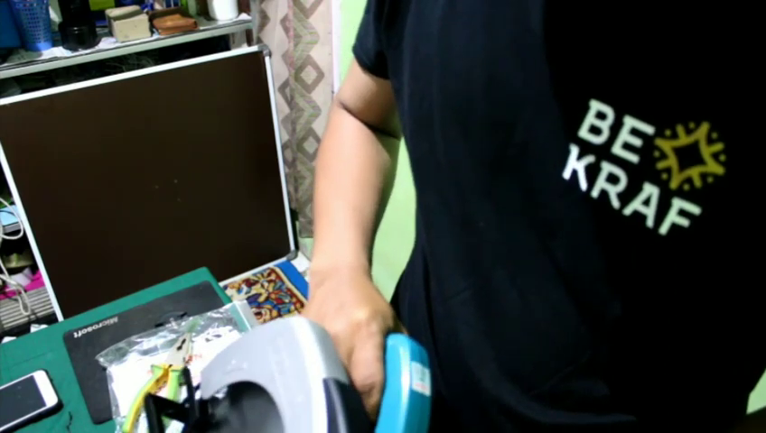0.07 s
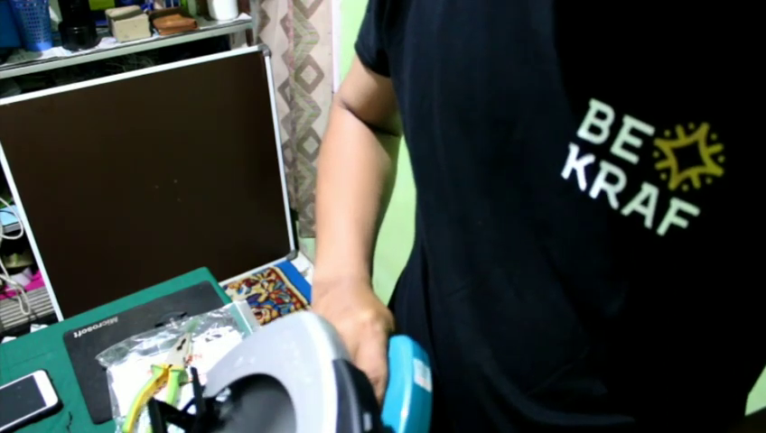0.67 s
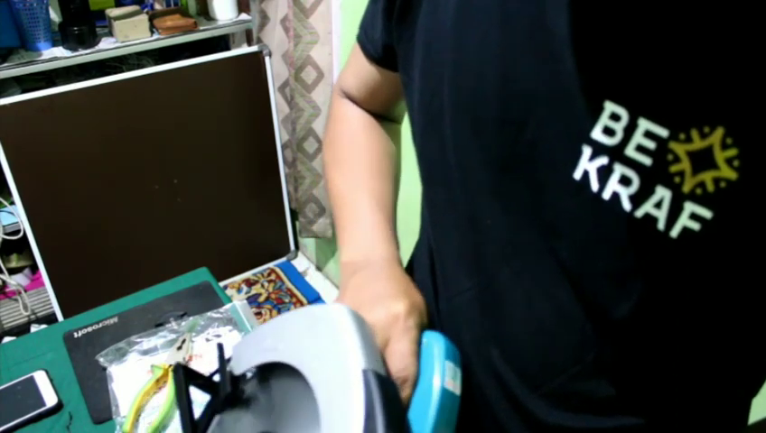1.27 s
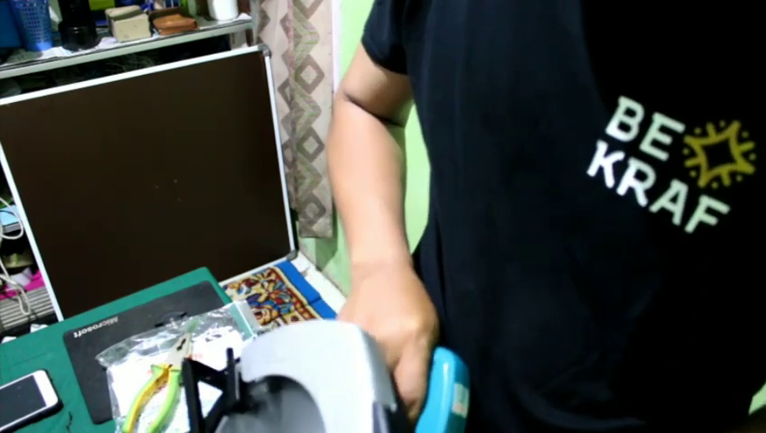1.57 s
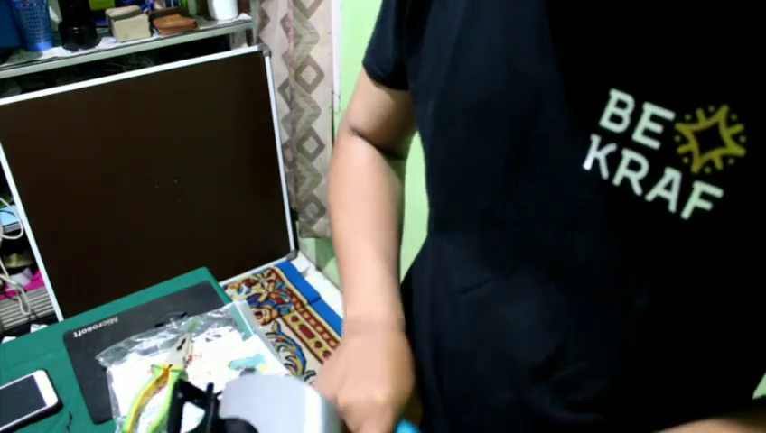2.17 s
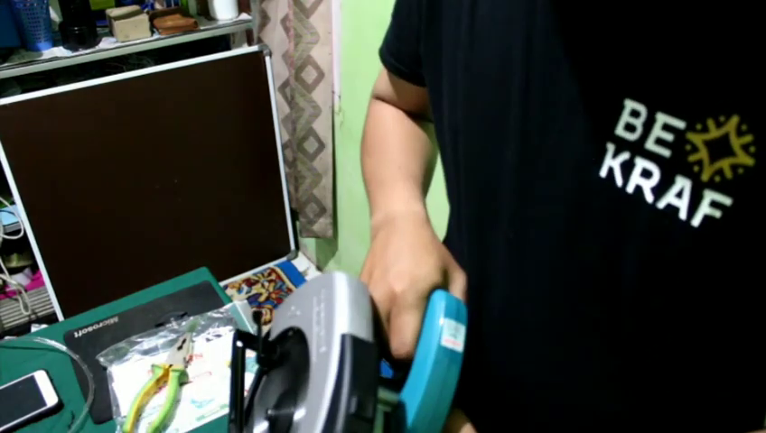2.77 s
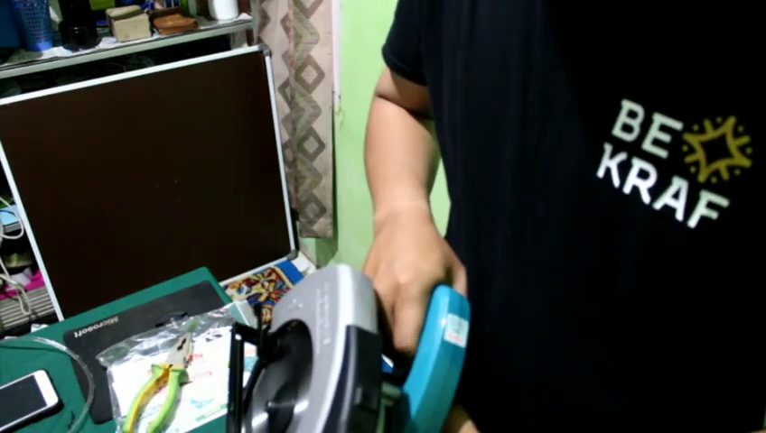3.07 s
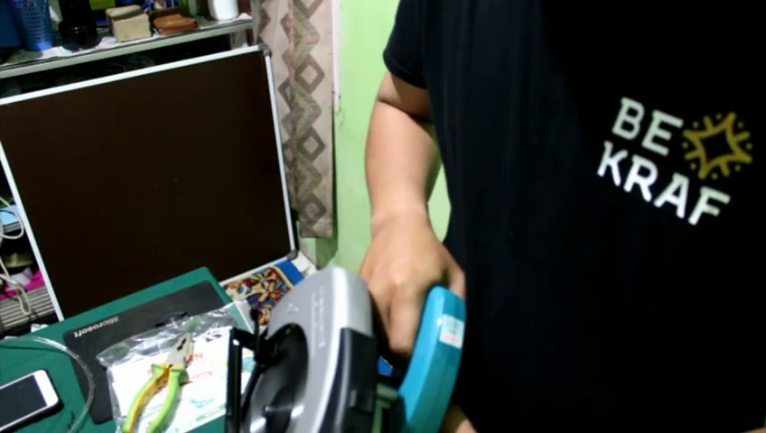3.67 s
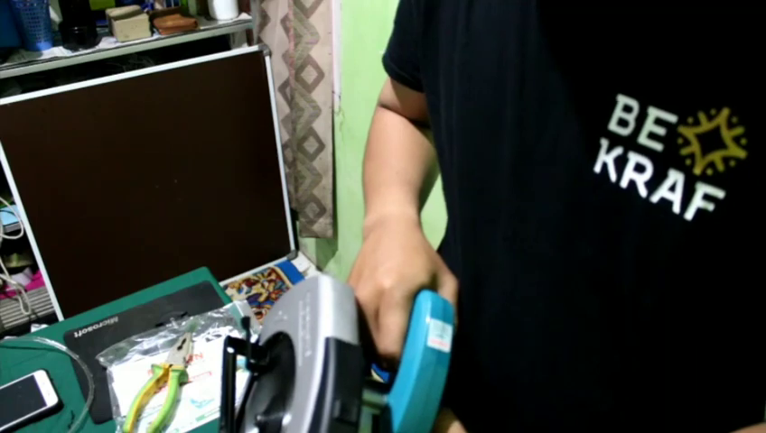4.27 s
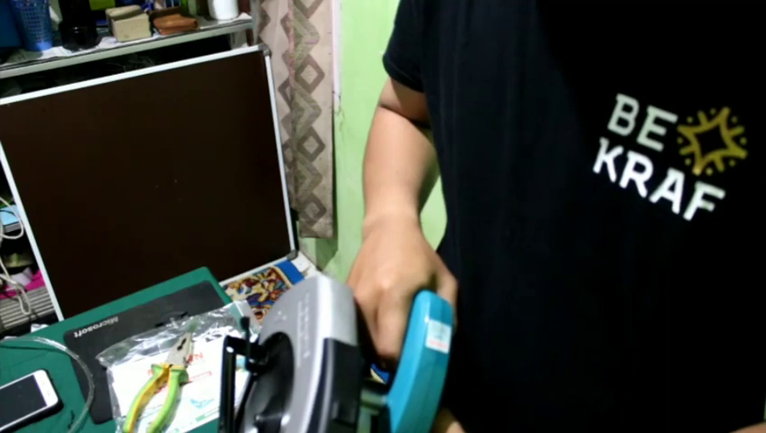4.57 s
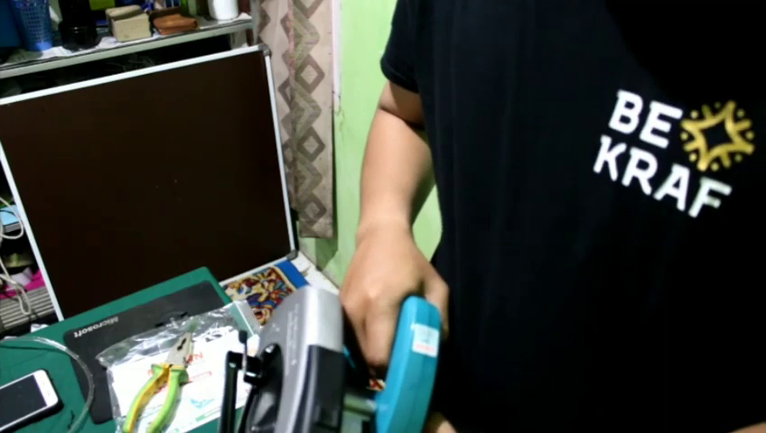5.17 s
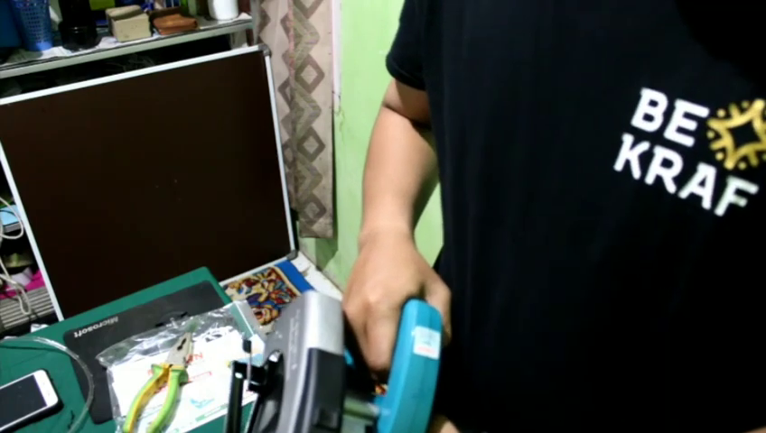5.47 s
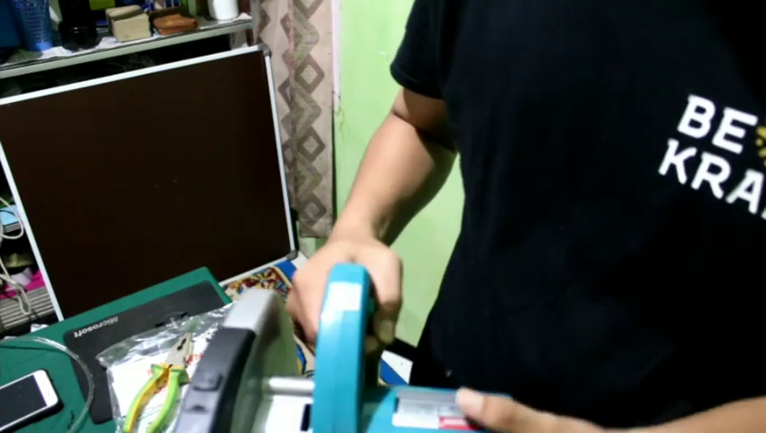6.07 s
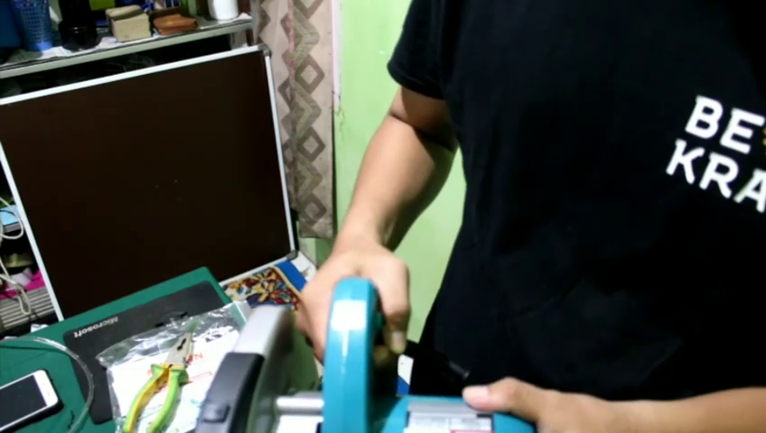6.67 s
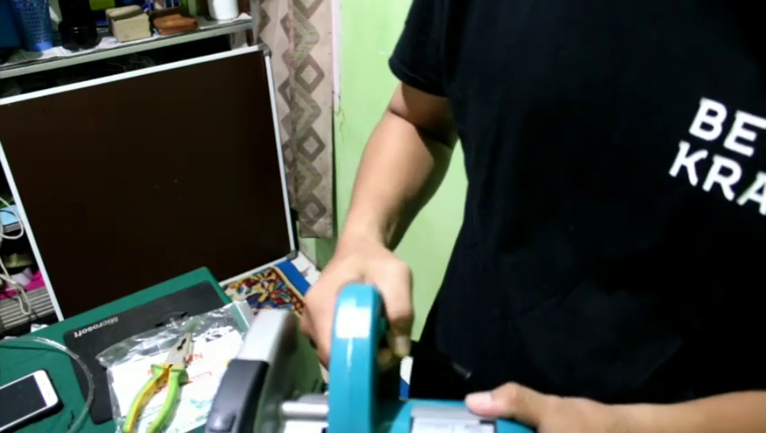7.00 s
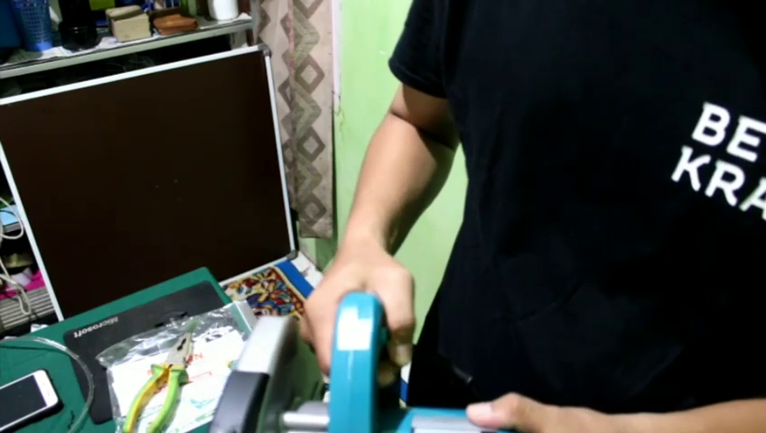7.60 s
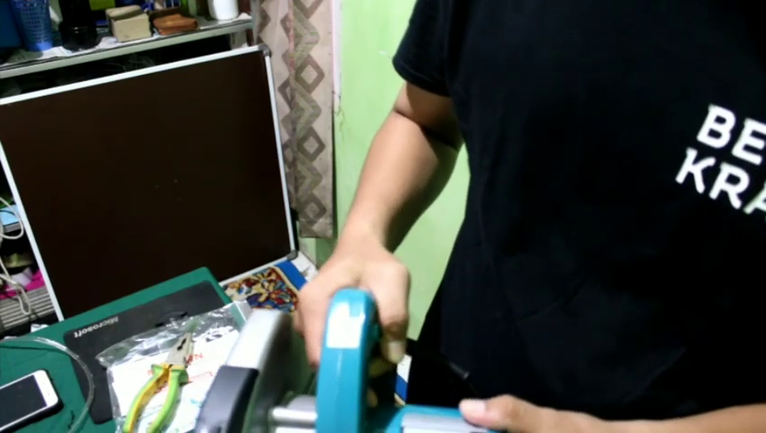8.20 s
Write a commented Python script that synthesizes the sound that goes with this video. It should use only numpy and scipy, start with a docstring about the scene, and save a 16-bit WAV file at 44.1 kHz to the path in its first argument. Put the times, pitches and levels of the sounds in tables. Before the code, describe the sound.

A handheld circular saw runs freely in a small workshop, heard up close. Its gears grind to a halt, the blade ringing faintly over a low handling rumble. The motor kicks in with a loud knock and whirs up briefly, then coasts with rapid metallic gear chatter. Its rush of air, hiss and whine grow brighter before a second, longer trigger pull winds it up and it coasts again.

```python
"""A handheld circular saw runs without load in a small workshop. First its gears grind to a halt, the blade
ringing and the last teeth snapping past. At 2.7 s the trigger kicks the motor up to speed with a knock;
it coasts down, gears chattering in their backlash, and from 5.3 s its vents swing towards the listener,
bringing up the fan rush, brush hiss and whine. At 6.9 s a second, longer pull winds it up again,
and from 7.7 s it coasts once more."""
import sys
import numpy as np
from scipy import signal
from scipy.fft import rfft, irfft
from scipy.io import wavfile
from scipy.ndimage import uniform_filter1d

SR = 44100
rng = np.random.default_rng(int(sys.argv[2]) if len(sys.argv) > 2 else 0)


def to_wav(sig):
    """Store sig (one row per channel, or 1-D mono) as 16-bit WAV at the path in sys.argv[1].

    Samples outside -1..1 are clipped; the rate is SR.
    """
    pcm = np.clip(np.atleast_2d(sig), -1, 1) * 32767
    pcm = np.round(pcm).astype(np.int16)
    wavfile.write(sys.argv[1], SR, pcm.T)  # frames by channels


N = 367794
TIME = np.arange(N) / SR
CUTOFF_HZ = 15500


def from_db(db):
    """Decibels to gain."""
    return 10 ** (np.asarray(db) / 20)


def rms_one(x):
    """Scale to rms 1."""
    return x / np.sqrt(np.mean(x ** 2) + 1e-20)


def in_time(points):
    """An automation curve of (seconds, value) points, read at every sample."""
    return np.interp(TIME, *np.transpose(points))


def at_hz(points, hz):
    """Read an EQ curve on a log-frequency axis."""
    f, level = np.transpose(points)
    return np.interp(np.log(np.maximum(hz, 1)), np.log(f), level)


def near(speed, centre, octaves):
    """1 at the centre speed, falling to 0 on either side of it."""
    return np.exp(-(np.log2(speed / centre) / octaves) ** 2)


def drift(rate_hz):
    """Smooth random wobble of rms 1."""
    r = np.exp(-40 * np.pi * rate_hz / SR)
    slow = signal.lfilter([1], [1, -2 * r, r * r], rng.standard_normal(N // 20 + 2002))[2000:]
    return np.interp(np.arange(N) / 20, np.arange(len(slow)), rms_one(slow))


def resonate(x, hz, width):
    """Two-pole resonance with gain 1 at its peak."""
    r = np.exp(-np.pi * width / SR)
    poles = [1, -2 * r * np.cos(2 * np.pi * hz / SR), r * r]
    return signal.lfilter(np.array([1, 0, -1]) * (1 - r * r) / 2, poles, x + 1e-18)


def colour(x, spectrum, resonances=(), size=4096):
    """Minimum-phase EQ of unit power: a broad curve plus resonances (Hz, width in Hz, lift in dB)."""
    cepstrum = irfft(np.log(from_db(at_hz(spectrum, np.fft.rfftfreq(size, 1 / SR)))))
    cepstrum[1:size // 2] *= 2
    cepstrum[size // 2 + 1:] = 0
    response = irfft(np.exp(rfft(cepstrum)))
    for hz, width, lift_db in resonances:
        response = response + (from_db(lift_db) - 1) * resonate(response, hz, width)
    return signal.oaconvolve(x, response / np.linalg.norm(response))[:N]


def noise(spectrum):
    """Coloured noise of rms 1."""
    return colour(rng.standard_normal(N), spectrum)


def impacts(per_s, spread_db):
    """Uneven metal-on-metal clicks of mean power 1."""
    chance = np.clip(per_s / SR, 1e-4, 1)
    sizes = rms_one(from_db(spread_db * np.clip(rng.standard_normal(N), -2, 2)))
    signs = rng.choice([-1, 1], N)
    return (rng.random(N) < chance) * sizes * signs / np.sqrt(chance)


def blow(age, rise, hold, decay):
    """A contact bites, scrapes for a moment and dies away; times in seconds."""
    return np.minimum(age / rise, 1) * np.exp(-np.maximum(age - hold, 0) / decay)


def bursts(rows, rise, decay):
    """Joint envelope of blows, each given as start in seconds, level in dB, scrape in seconds."""
    power = np.zeros(N)
    for s, db, hold in rows:
        start = int(s * SR)
        age = TIME[:min(SR // 5, N - start)]
        power[start:start + len(age)] += (from_db(db) * blow(age, rise, hold, decay)) ** 2
    return np.sqrt(power)


def tones(speed, orders, radiation, width_hz, steady):
    """Partials locked to the rotor; all but a steady share of each is smeared into a rough band."""
    out, angle = 0, 2 * np.pi * np.cumsum(speed) / SR
    rough = drift(width_hz) + 1j * drift(width_hz)
    swing = np.sqrt(2 * steady) + np.sqrt(1 - steady) * rough
    size, slip = np.abs(swing), np.angle(swing)
    for multiple, db in orders:
        hz, shift = multiple * speed[::64], rng.integers(N)
        gain = np.repeat((hz < CUTOFF_HZ) * from_db(db + at_hz(radiation, hz)), 64)[:N]
        out = out + gain * np.roll(size, shift) * np.sin(multiple * angle + np.roll(slip, shift))
    return out


# Room tone EQ. Each row: frequency in Hz, level in dB.
ROOM_TONE_EQ = [(40, -24), (100, -17), (200, -5), (400, -16), (800, 1), (1600, -5), (4000, -9), (9000, -17),
                (15000, -47)]

def room_tone():
    """A quiet, steady bed of noise."""
    return from_db(-55) * noise(ROOM_TONE_EQ)


# The rumble's fader. Each row: time in seconds, level in dB.
HANDLING_FADER = [(0, -58), (1.0, -56.5), (1.5, -45.5), (1.65, -41), (2.0, -47.5), (2.6, -49.5), (2.8, -62),
                  (8.34, -60)]
# Its dull tone. Each row: frequency in Hz, level in dB.
HANDLING_EQ = [(25, -20), (45, -20), (65, -10.5), (110, -9.5), (200, -8), (400, -12.5), (1000, -20),
               (3000, -46)]

def handling():
    """Hands shift on the saw's body with a low rumble."""
    return from_db(in_time(HANDLING_FADER) + 1.5 * drift(2)) * noise(HANDLING_EQ)


# Peaks and nulls between saw, bench and walls. Each row: frequency in Hz, width in Hz, lift in dB.
ROOM_MODES = [(280, 17, 2), (345, 50, 4.5), (435, 60, -6), (506, 16, 2.5), (610, 40, 4.5), (655, 30, -3),
              (735, 60, 4), (800, 50, -4), (875, 45, 4.5), (935, 25, 3), (1020, 35, -3), (1070, 30, 2.5),
              (1120, 30, -3), (2880, 200, -3), (5140, 520, -3.5)]

def workshop(x, t60, wet_db):
    """Standing waves, then dense, short reflections from close walls and shelves."""
    for hz, width, lift_db in ROOM_MODES:
        x = x + (from_db(lift_db) - 1) * resonate(x, hz, width)
    age = TIME[:SR // 2]
    tail = rng.standard_normal(len(age)) * from_db(-60 * age / t60) * (age > .003)
    return x + from_db(wet_db) * signal.oaconvolve(x, tail / np.linalg.norm(tail))[:N]


# The last teeth before the blade stops. Each row: start in seconds, level in dB.
SNAPS = [(1.992, -22), (2.102, -32), (2.180, -46)]
# Their bright tone. Each row: frequency in Hz, level in dB.
SNAP_EQ = [(300, -17), (1500, 1), (3000, 7), (8000, -5), (11000, -20), (15000, -32)]

def snaps():
    """Dry clicks as single teeth drop off one another."""
    force = bursts([(s, db, .002) for s, db in SNAPS], rise=.0006, decay=.004)
    return colour(impacts(12000, spread_db=4) * force, SNAP_EQ)


# The steel blade's modes. Each row: frequency in Hz, level in dB, width in Hz.
BLADE_MODES = [(860, -3, 3), (926, -6, 12), (1798, 0, 10), (1803, -5, 4), (1868, -7, 3), (2099, -8, 4),
               (2153, -9, 4), (2412, 0, 12), (2487, -1, 9), (2665, 1, 12), (2848, -4, 10), (2918, -4, 10),
               (3172, -3, 8), (3178, -11, 4), (3235, 1, 10), (3435, -7, 9), (3537, -9, 3), (3598, -5, 4),
               (3612, -3, 9), (4086, -10, 3), (4393, -4, 9), (4540, -5, 12), (4737, -1, 10), (4790, -5, 10),
               (4947, -5, 9), (4996, -6, 9), (5340, -13, 9), (5841, -9, 9), (6234, -9, 9), (6573, -8, 10),
               (6700, -10, 12), (7181, -9, 9), (7270, -10, 9), (7355, -18, 4), (7391, -6, 8),
               (7752, -15, 3), (7811, -12, 8), (7900, -12, 9), (8250, -14, 12), (8430, -15, 12),
               (9500, -19, 9), (10200, -21, 10), (10810, -19, 10), (11050, -22, 10)]

def blade_ring(teeth, speed):
    """The teeth ring the blade: damped modes follow the speed, narrow ones come out as it slows."""
    rubbed = teeth * from_db(-12.5) * np.tanh(speed / 184)
    free = teeth * from_db(-11) / np.hypot(1, (speed / 45.3) ** 3)
    waver = from_db(1.6 * drift(6.1))
    out = 0
    for hz, db, width in BLADE_MODES:
        mode = resonate(free if width < 5 else rubbed, hz, width) * np.sqrt(SR / (np.pi * width))
        out = out + from_db(db) * np.roll(waver, rng.integers(N)) * mode
    return out


# How hard the slow turns grind. Each row: time in seconds, level in dB.
GRIND_FADER = [(0, -22), (.7, -17.5), (1.25, -16), (1.55, -13.5), (1.85, -16), (2.05, -14.5)]
# Accents where the teeth catch hardest. Each row: start in seconds, level in dB.
CATCHES = [(.157, -18.5), (0.223, -17.5), (0.303, -18), (0.678, -19.5), (0.867, -28), (.920, -35),
           (.998, -19), (1.196, -20)]
# The grind's tone. Each row: frequency in Hz, level in dB.
GRIND_EQ = [(120, -41), (330, -17.5), (500, -11), (850, -2), (1200, 1), (1620, 6.5), (2240, 1),
            (2900, -2.5), (3900, -10.5), (4600, -3), (5400, -12), (8500, -19), (11000, -23.5), (15500, -52)]

def runout(speed, fade_speed=70, release_s=.0081):
    """Over the last slow turns the teeth grind and catch, the brushes rasp and the blade rings on."""
    r = np.exp(-1 / (release_s * SR))
    turning = 1 - signal.lfilter([1 - r], [1, -r], 1 - np.tanh(speed / fade_speed))
    pressure = from_db(in_time(GRIND_FADER) + 1.7 * drift(64)) * turning * (TIME < PULLS[0][0])
    catches = from_db(1.5) * bursts([(s, db, .0048) for s, db in CATCHES], rise=.0022, decay=.0093)
    teeth = impacts(2500 + 30 * speed, spread_db=.5) * np.hypot(pressure, catches)
    grind = from_db(-.2) * colour(teeth, GRIND_EQ, [(1655, 120, 6.5), (7040, 180, -4)])
    rasp = near(speed, 19.7, octaves=.7) * resonate(resonate(teeth, 8400, 540), 8400, 540)
    return grind + rasp + blade_ring(teeth, speed)


# Gearbox and blade guard resonances. Each row: frequency in Hz, width in Hz, lift in dB,
# level of the struck ring in dB.
HOUSING_MODES = [(1606, 200, 2.5, -4.5), (1690, 120, 3, -23), (2490, 89, 6.5, -20), (3200, 55, 4.5, -22),
                 (3394, 49, 13.5, -25), (4570, 710, 6, -12), (5690, 90, 2, -16.5), (6110, 60, 8.5, -17),
                 (6700, 89, 8.5, -20.5), (7960, 160, 11.5, -34), (8270, 130, -10, -15)]

def housing_ring(contacts, detune=.016):
    """Each contact lands on another tooth, so the housing rings at a slightly different pitch."""
    out, age = np.zeros(N), TIME[:SR // 10]
    hz, _, _, struck_db = np.transpose(HOUSING_MODES)
    for s, db, hold, clang_db in contacts:
        offset, phase = rng.standard_normal((2, len(hz)))
        gain = from_db(db + struck_db + clang_db * (hz < 2000))
        modes = np.sin(2 * np.pi * (np.outer(age, hz * (1 + detune * offset)) + phase))
        start = int(s * SR)
        out[start:start + len(age)] += modes @ gain * blow(age, rise=.004, hold=hold / 2, decay=.0076)
    return out


# Gear slaps between the two pulls. Each row: start in seconds, level in dB, scrape in seconds,
# extra low clang in dB.
SLAPS = [(2.978, -14, 0.003, -7), (3.03, -12, 0.0028, 0), (3.104, -9.5, 0.003, -6), (3.144, -17, 0.005, -7),
         (3.191, -10, 0.0036, -1), (3.238, -14.5, 0.005, -1), (3.299, -15, 0.0065, 6),
         (3.36, -14, 0.0084, -5), (3.423, -12, 0.0064, -12), (3.482, -14.5, 0.01, 1),
         (3.552, -11, 0.0046, -21), (3.592, -15.5, 0.0073, -17), (3.636, -17.5, 0.0083, 3),
         (3.697, -13, 0.0048, 0.5), (3.747, -19.5, 0.011, -2), (3.806, -16.5, 0.025, -13),
         (3.862, -14, 0.0042, 9.5), (3.916, -15, 0.0038, -1), (3.959, -17.5, 0.012, -13),
         (4.013, -14.5, 0.0042, -16), (4.056, -14, 0.0077, 9), (4.133, -10, 0.0024, 7),
         (4.183, -18, 0.003, 14.5), (4.237, -29, 0.008, 18), (4.297, -17.5, 0.0069, 10.5),
         (4.342, -18.5, 0.014, 7), (4.399, -13, 0.003, 13), (4.462, -18.5, 0.0037, 5),
         (4.515, -18, 0.0045, 11.5), (4.574, -20, 0.008, 10), (4.631, -20, 0.01, 7),
         (4.688, -16.5, 0.0068, 13), (4.753, -16.5, 0.0077, 11.5), (4.814, -15.5, 0.0054, 9),
         (4.877, -16, 0.0082, 7), (4.947, -11, 0.0034, -13), (5.005, -19, 0.019, -1),
         (5.071, -17, 0.0099, 11), (5.141, -16, 0.0084, 12), (5.212, -17, 0.0059, 14),
         (5.28, -16.5, 0.0069, 13), (5.355, -16.5, 0.0061, 12.5), (5.429, -17, 0.0054, -3),
         (5.472, -22, 0.021, -2), (5.539, -19.5, 0.031, 6), (5.6, -18, 0.014, -19), (5.634, -18, 0.012, -3),
         (5.683, -17, 0.0067, -9), (5.719, -19, 0.0083, 8), (5.77, -18.5, 0.007, -3),
         (5.808, -18, 0.0058, 11.5), (5.855, -17.5, 0.0087, 5), (5.889, -20.5, 0.014, 5),
         (5.936, -20, 0.022, 3), (5.992, -16, 0.01, 3.5), (6.032, -18.5, 0.012, -8),
         (6.077, -19.5, 0.019, -12), (6.13, -18, 0.015, 7), (6.18, -18.5, 0.014, 9),
         (6.231, -19, 0.0098, 9), (6.284, -19.5, 0.0081, 12.5), (6.332, -22.5, 0.017, 7),
         (6.389, -17.5, 0.008, 4.5), (6.442, -20.5, 0.016, -2), (6.494, -21, 0.023, 7.5),
         (6.553, -18.5, 0.016, 6), (6.612, -24.5, 0.012, 7), (6.668, -18, 0.0052, 12),
         (6.713, -23, 0.003, 16.5), (6.779, -22.5, 0.02, 13.5), (6.844, -18.5, 0.005, -4.5)]
# Their tone. Each row: frequency in Hz, level in dB.
SLAP_EQ = [(120, -55), (250, -11), (550, -9), (1000, 2.5), (1500, 6), (2000, 9), (2600, 5.5), (3500, -3),
           (5000, -2), (7000, -10.5), (9000, -8), (11500, -22), (15000, -46)]

def backlash(facing, rebound_s=.0074, loss_db=11.5):
    """The coasting blade overruns the pinion and slaps across the backlash; each slap rebounds once."""
    rebounds = [(s + hold + rebound_s, db - loss_db, .004, clang_db) for s, db, hold, clang_db in SLAPS]
    contacts = np.vstack([SLAPS, rebounds])
    scrapes = impacts(9000, spread_db=3) * bursts(contacts[:, :3], rise=.0042, decay=.0065)
    chatter = from_db(-.5) * colour(scrapes, SLAP_EQ, [mode[:3] for mode in HOUSING_MODES])
    presence = from_db(5.3) * facing * resonate(chatter, 4700, 1170)  # brighter once the saw is turned
    return chatter + presence + housing_ring(contacts)


# The gear rattle's fader. Each row: time in seconds, level in dB.
MESH_FADER = [(2.87, -16.5), (3.1, -21.5), (4.15, -19.5), (4.5, -23.5), (5.3, -18), (6.1, -25.5),
              (6.6, -23), (6.83, -18), (6.9, -13.5), (6.98, -13), (7.1, -15.5), (7.3, -35)]
# Its tone. Each row: frequency in Hz, level in dB.
MESH_EQ = [(120, -35), (250, -21), (550, -6), (1000, -8.5), (1550, 3), (2000, -1.5), (2600, -8),
           (3500, -15), (5000, -10), (7000, -23), (9000, -26), (11500, -59), (15000, -71)]

def gear_mesh(speed):
    """Meshing teeth rattle through the housing, more densely at speed."""
    rattle = impacts(2500 + 9 * speed, spread_db=3.5) * from_db(in_time(MESH_FADER) + 3 * drift(52))
    return from_db(-5.5) * colour(rattle, MESH_EQ, [mode[:3] for mode in HOUSING_MODES])


# The motor's starting kicks. Each row: start in seconds, level in dB, bouncing time in seconds.
KICKS = [(2.692, 2.5, 0.11), (6.908, -1, .04)]
# Light ticks of the resting saw. Each row: start in seconds, level in dB.
TICKS = [(2.315, -38), (2.571, -38.5)]
# The body's tone under both. Each row: frequency in Hz, level in dB.
KNOCK_EQ = [(40, -23), (130, -28), (220, -1), (400, 0.5), (800, 5), (1500, 15.5), (2300, 9), (4000, 1.5),
            (8000, -15), (11000, -19), (15000, -62)]

def knocks(gap_s=.015, shrink=.9, loss_db=2):
    """The resting saw ticks; sudden torque slams the teeth together, bouncing ever faster and weaker."""
    bounce = np.arange(12)
    delay = np.cumsum(np.r_[0, gap_s * shrink ** bounce[:-1]])
    hits = [(s + delay[k], db - k * loss_db) for s, db, length in KICKS for k in bounce[delay < length]]
    force = bursts([(s, db, .002) for s, db in hits + list(TICKS)], rise=.0008, decay=.011)
    return from_db(-7) * colour(impacts(9000, spread_db=2.5) * force, KNOCK_EQ, [(1510, 78, 1.8)])


def speed_gain(speed, cruise_db, per_decade_db):
    """Gain of a layer that grows with speed; it is at cruise_db at 400 turns per second."""
    return from_db(cruise_db + per_decade_db * np.log10(speed / 400))


# How well the casing gives off a tone. Each row: frequency in Hz, level in dB.
CASING_EQ = [(100, -35), (250, -10), (350, 0), (800, -7), (1200, -8), (1600, 0), (2100, 0.5), (2500, 3),
             (3000, 4), (3500, 0), (3950, 1), (4200, -6), (4500, 1), (4850, 1), (5300, -5), (5800, -2),
             (6400, -7), (7500, -8), (8600, -1), (9300, -8), (10500, -12), (12000, -16), (15000, -31)]
# The howl of passing bearing balls. Each row: multiple of rotor speed, level in dB.
BALL_ORDERS = [(4.45, 0.5), (6, -3.5), (8.9, 1), (10.3, -7), (12.2, -12)]
# Their high, smeared overtones. Each row: multiple of rotor speed, level in dB.
SLIP_ORDERS = [(17.8, 0), (22.6, -6), (24, -5), (26.7, -6.5)]

def bearing(speed, facing, powered):
    """The unbalanced rotor hums, the cage drones on the blade side, and the balls howl and slip."""
    hum = tones(speed, [(1, 0)], CASING_EQ, width_hz=20, steady=.8)
    hum *= speed_gain(speed, -47, 30) * from_db(10 * facing)
    cage = from_db(-41.5) * (1 - facing) * tones(speed, [(.47, 0)], CASING_EQ, width_hz=20, steady=.3)
    balls = tones(speed, BALL_ORDERS, CASING_EQ, width_hz=110, steady=0)
    slip = tones(speed, SLIP_ORDERS, CASING_EQ, width_hz=200, steady=0)
    critical = near(speed, 218, octaves=.22)  # it rattles as the rotor passes a critical speed
    howl_gain = speed_gain(speed, -36.5, 11) * from_db(.41 * facing + 8 * powered + 7.5 * critical)
    return hum + cage + howl_gain * (balls + slip)


# How well the vents let the whine out. Each row: frequency in Hz, level in dB.
VENT_EQ = [(1700, -16), (2400, -12), (2850, -4), (3120, -1), (3300, -5), (3500, 1), (3750, -1), (3980, 1),
           (4200, -9), (4330, -7), (4490, 2), (4650, -3), (4800, -2), (5300, -11), (7500, -17)]
# Brushes ticking over the bar edges. Each row: multiple of rotor speed, level in dB.
EDGE_ORDERS = [(36, -1), (42, -6), (48, -4), (54, -7), (61, -4), (66, -8), (73, -6)]

def commutator(speed, facing, bars=12):
    """A clean whine swells and fades as it glides through the vents' resonances, with thin overtones."""
    whine = from_db(-36 + 14 * facing) * tones(speed, [(bars, 0)], VENT_EQ, width_hz=20, steady=.93)
    edge_db = np.interp(speed, [200, 500], [-39, -53])
    return whine + from_db(edge_db) * tones(speed, EDGE_ORDERS, CASING_EQ, width_hz=90, steady=0)


# The fan's rush. Each row: frequency in Hz, level in dB.
FAN_EQ = [(30, -60), (110, -35), (190, -18.5), (270, -13), (400, -6), (600, 3), (850, 2.5), (1300, 3),
          (2400, 0.5), (4500, -32), (9000, -46.5)]

def fan(speed, facing):
    """Air rushes from the vents, louder with speed and as they turn to the listener."""
    return speed_gain(speed, -29, 32.7) * from_db(8.2 * facing + .86 * drift(23)) * noise(FAN_EQ)


# The brushes' hiss. Each row: frequency in Hz, level in dB.
BRUSH_EQ = [(1000, -23), (2300, 14), (3300, 15), (4500, 12), (6000, 8.5), (8500, 0.5), (10500, -7),
            (13000, -16), (15500, -40)]
# The sparks' sizzle. Each row: frequency in Hz, level in dB.
SPARK_EQ = [(2000, -19), (6000, 3), (9500, 5), (12000, -11), (15000, -30)]

def brushes(speed, facing, powered):
    """The brushes hiss and flutter; under power they spark and pulse with the mains."""
    hiss = colour(impacts(14000, spread_db=2), BRUSH_EQ, [(4350, 290, 2.2), (8360, 1200, 3.2)])
    hiss *= speed_gain(speed, -31.5, 35.7) * from_db(14.3 * facing)
    flutter = from_db(np.interp(speed, [150, 400], [2.2, 1.2]) * drift(50))
    sparks = from_db(-35.5) * powered * colour(impacts(5000, spread_db=14), SPARK_EQ)
    mains = 1 + .25 * powered * np.sin(2 * np.pi * 100 * TIME)
    return flutter * mains * (hiss + sparks)


# Trigger pulls. Each row: press in seconds, release in seconds, target speed in turns per second,
# time constant in seconds.
PULLS = [(2.69, 2.92, 637, .1125), (6.907, 7.66, 415, .281)]

def rotor_speed(start_speed=146, friction=62.8, fan_drag=.00036):
    """Turns per second: power pulls the rotor towards its target, otherwise friction and drag slow it."""
    steps, step_s = np.linspace(0, N / SR, 8000, retstep=True)
    speed = [start_speed]
    for s in steps[1:]:
        change = -friction - fan_drag * speed[-1] ** 2
        for on, off, target, lag_s in PULLS:
            if on < s < off:
                change = (target - speed[-1]) / lag_s
        speed.append(max(speed[-1] + change * step_s, .01))
    return np.interp(TIME, steps, speed)


def motor(speed, facing, settle_s=.14):
    """Fan and brushes, plus the rotor's tones, which duck after each kick until it runs true."""
    trigger = sum(1. * (TIME > on) * (TIME < off) for on, off, _, _ in PULLS)
    powered = uniform_filter1d(trigger, size=SR // 20)
    ducks = [1 - (TIME > on) * np.exp(-((TIME - on) / settle_s) ** 4) for on, _, _, _ in PULLS]
    rush = fan(speed, facing) + brushes(speed, facing, powered)
    tonal = commutator(speed, facing) + bearing(speed, facing, powered)
    return rush + np.prod(ducks, axis=0) * tonal


# The vents swing towards the listener. Each row: time in seconds, share of the turn from 0 to 1.
FACING = [(5.3, 0), (5.85, 0.84)]

def scene():
    """The saw in its workshop, over handling rumble and room tone."""
    speed, facing = rotor_speed(), in_time(FACING)
    started = np.clip((TIME - PULLS[0][0]) / .032, 0, 1)  # fades in at the first pull
    saw = runout(speed) + backlash(facing) + knocks() + snaps()
    saw += started * (gear_mesh(speed) + motor(speed, facing))
    return (workshop(saw, t60=.12, wet_db=-7.5) + handling() + room_tone())[None]


def record(dry):
    """The hardest knocks clip, and a steep low-pass cuts the top."""
    lowpass = signal.ellip(10, .1, 70, CUTOFF_HZ, fs=SR, output="sos")
    return signal.sosfiltfilt(lowpass, np.clip(dry, -1, 1))


dry = scene()
out = record(dry)
to_wav(out)
```